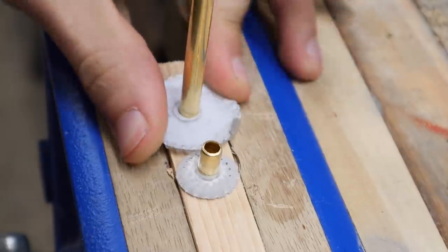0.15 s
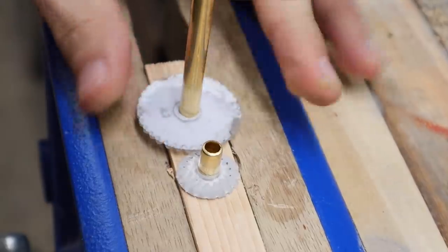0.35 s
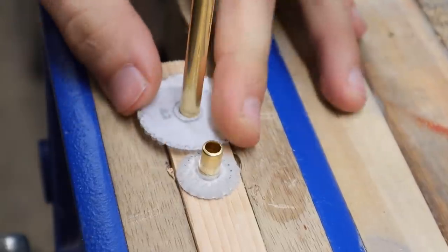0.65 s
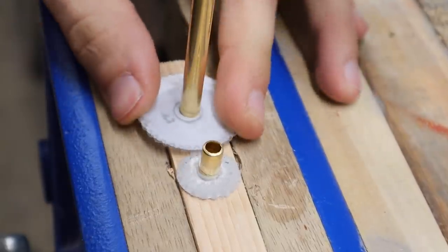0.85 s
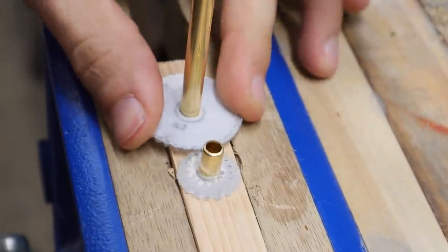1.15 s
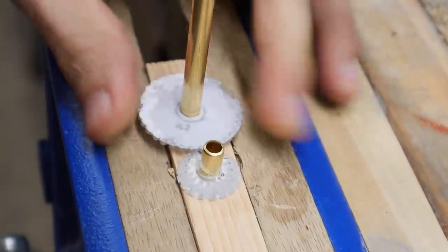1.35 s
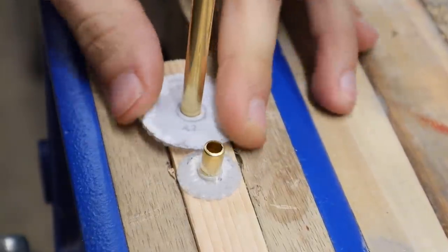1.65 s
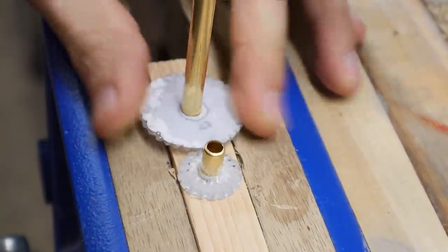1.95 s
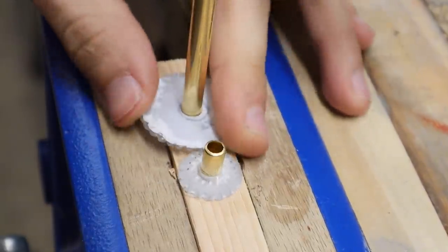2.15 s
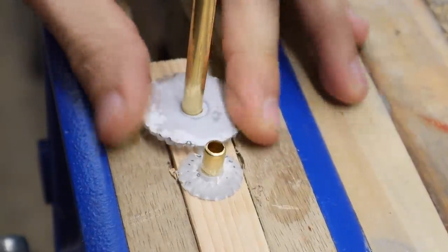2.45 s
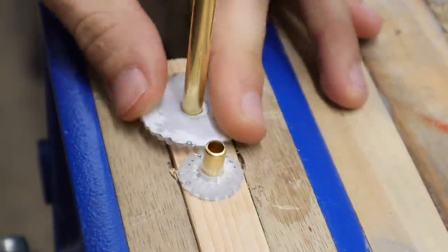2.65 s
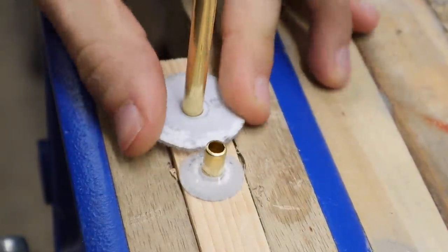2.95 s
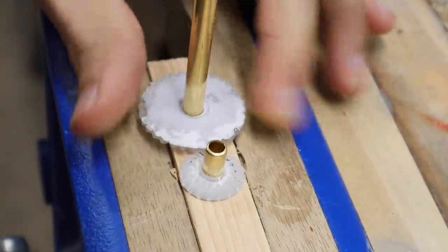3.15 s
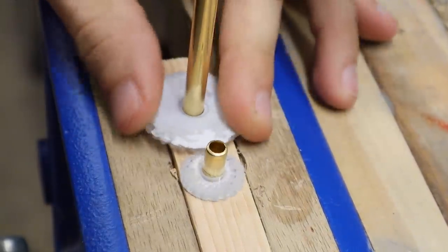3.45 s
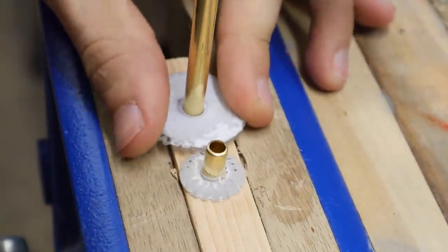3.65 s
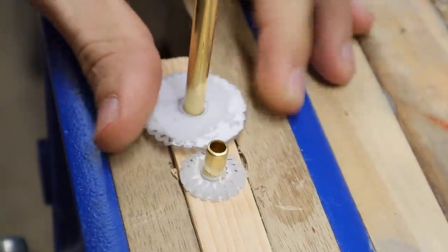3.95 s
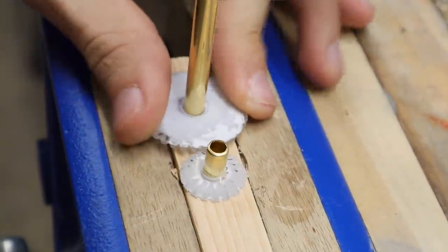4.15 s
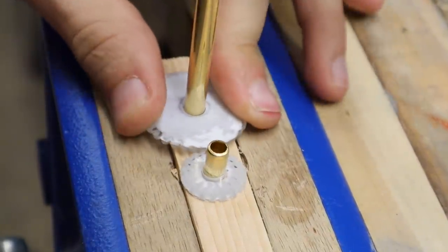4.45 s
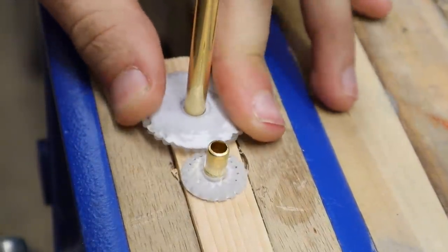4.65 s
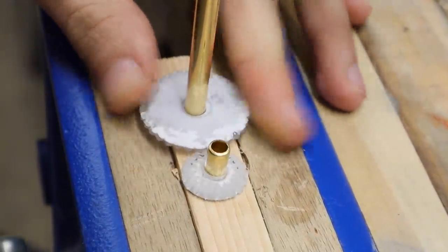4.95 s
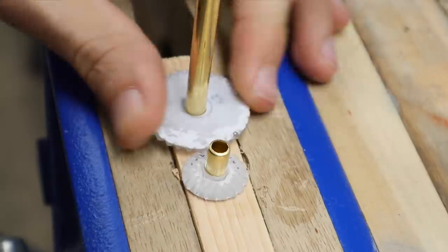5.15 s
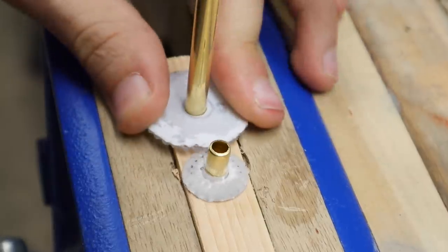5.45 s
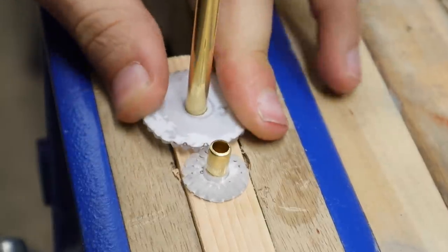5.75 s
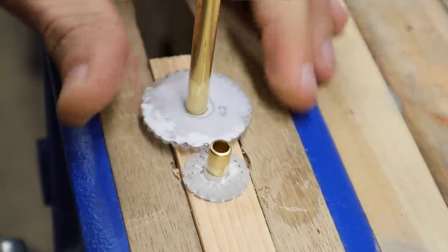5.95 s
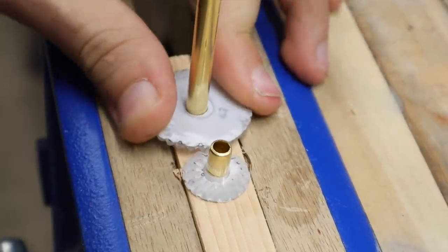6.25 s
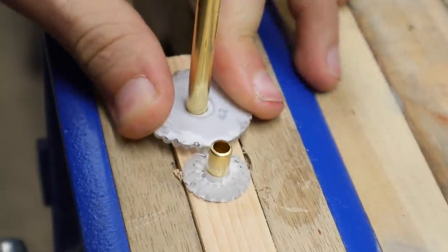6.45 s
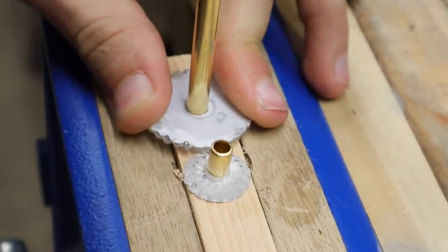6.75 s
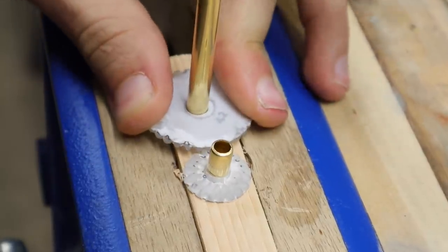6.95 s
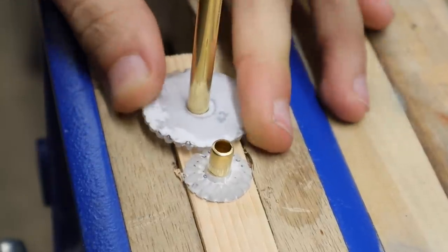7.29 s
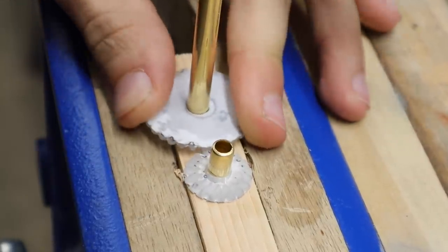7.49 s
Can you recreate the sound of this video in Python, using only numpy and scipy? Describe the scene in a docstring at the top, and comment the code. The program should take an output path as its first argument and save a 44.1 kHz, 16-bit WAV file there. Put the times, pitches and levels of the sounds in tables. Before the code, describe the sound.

Metal gear teeth catch and slip with irregular sharp clicks, light ticks and soft bumps, close up in a quietly humming workshop.

```python
"""Hand-turned metal gears

Two hand-cut metal gears on brass tubes are turned by hand on a wooden workbench.
Rough teeth bind, scrape and snap past each other; each snap cracks, rings the tube and thumps the bench.
Light ticks and soft low bumps on the bench fall between the snaps.
Behind them a small workshop hums, with the thin whine of a fan."""
import sys
import numpy as np
from scipy import signal
from scipy.io import wavfile

SR = 44100
rng = np.random.default_rng(int(sys.argv[2]) if len(sys.argv) > 2 else 0)


def store_pcm(level_fs):
    """Save levels as 16-bit WAV."""
    pcm = np.round(np.clip(level_fs, -1, 1) * 32767).astype(np.int16)
    wavfile.write(sys.argv[1], SR, np.atleast_2d(pcm).T)


N = 336042
RING_TIME = np.arange(SR // 3) / SR   # seconds since a hit began
BAND_EDGES_HZ = np.geomspace(22, 17000, 30)
BAND_HZ = np.sqrt(BAND_EDGES_HZ[1:] * BAND_EDGES_HZ[:-1])

# Sharp snaps, light ticks and soft low bumps on the bench. Each row: start in seconds, level in dB,
# contact time in seconds, boosts in dB for bench thud, board knock, tube ring and sharp edge,
# then the gear's note in Hz.
HITS = [ (0.2042, 12, 0.0018, -5.5, 8.5, -9, 0.5, 5030), (0.465, -13, .02, -1, 1, -20, 2, 3330),
        (0.477, -21.5, 0.0025, -4, -4, -12, 20, 3500), (0.945, -16, 0.0093, 10, 13, -16, 10, 4900),
        (1.520, -15.5, 0.0087, 8, 1.5, -17, 13, 3840), (2.147, -13, 0.0088, 4.5, -16, 3.5, 7, 2090),
        (2.4401, -9, 0.003, 9.5, -2, 6.5, 12, 5200), (2.659, -16.5, 0.0068, -10, -12, -16, 6, 5380),
        (2.9227, 5, 0.002, 2.5, 3, -11, 2, 3110), (2.930, -2, 0.0024, -12, 5, -4, 0, 2000),
        (3.327, -20, 0.0045, -4, -10, -10, 11, 3660), (3.572, -13.5, 0.0074, -14, 2, -23, 2, 3850),
        (3.8159, 2, 0.00092, -0.5, 3.5, -1.5, 1, 3560), (4.118, -22, 0.0027, -14, 4, -8, 20, 5240),
        (4.463, -19, .025, 15.5, 19, 10.5, 3, 5300), (4.7723, -12, 0.0088, 14.5, 0, -17, 14, 5130),
        (4.9505, -6.5, 0.00093, 0, -10, -16, 8, 3720), (4.955, -3.5, .0015, 2, 5, -4, 2, 3730),
        (5.150, -14, 0.014, 0, -3, 1, 4, 2020), (5.4722, -7, 0.0014, 5.5, 9, 1.5, -13, 3830),
        (6.075, -18, 0.0011, -6, -12, -16, 12, 3800), (6.701, 15, 0.0012, 6, 4, -3.5, 6.5, 2020),
        (7.289, -8, 0.0036, 8.5, -10, 7, 7.5, 5330), (7.296, -10, 0.024, -14, 9.5, 5, 8, 2140)]
# Where a hit's tone is shaped, in Hz: thud, knock, dip, bottom and top of the metal's ring, edge.
COLOUR_HZ = (260, 480, 750, 1200, 4300, 10000)


def snaps_ticks_and_bumps(dip_db=-4.5, plate_db=-2.5):
    """Each hit, from a tooth slipping free to a soft bump, sets the gears, tube and bench ringing."""
    out = np.zeros(N)
    noise = noise_bands(N)
    for start, db, contact, thud_db, knock_db, tube_db, edge_db, gear_hz in HITS:
        # the bench carries the lows, a sharp edge the highs
        colour = list(zip(COLOUR_HZ, (thud_db, knock_db, dip_db, 0, 0, edge_db)))
        ring_scale = 0.97 * from_db(0.03 * db)   # harder hits ring a little longer
        sound = contact_noise(noise, db, contact, gear_hz, colour, ring_scale)
        sound += gears_and_bench_ring(colour, ring_scale)
        # each hit favours one note of the gear, quickly damped by the fingers
        sound += ringing_note(gear_hz, db=9.5, fade_s=125 / gear_hz, build_cycles=0.73)
        sound += tube_ring(start, tube_db, ring_scale)
        add(out, start, from_db(db) * sound)
    # the gear plate sounds loudest near its own high note
    return out + from_db(plate_db) * resonate(out, hz=5450, width_hz=550)


# The tone of a hit's first burst. Each row: pitch in Hz, level in dB.
CONTACT_TONE = [(60, -10), (250, 1.5), (700, -4), (1100, -8), (1600, -11.5), (2200, 6.5), (2900, -9),
                (3800, -1.5), (5500, -8), (7200, -14.5), (10000, -19), (16000, -30)]
# The tone of the dense ring after it, its tail. Each row: pitch in Hz, level in dB.
TAIL_TONE = [(60, 0), (200, -9), (500, -14), (750, -2), (1100, 5.5), (1600, -6.5), (2200, -18),
             (3500, -16.5), (5500, -23), (7500, -32), (16000, -48)]
# How long the tail lasts. Each row: pitch in Hz, fade time in seconds before ring_scale stretches it.
TAIL_FADE = [(100, 0.5), (400, 0.15), (1200, 0.096), (2500, 0.38), (6000, 0.15), (14000, 0.076)]


def contact_noise(noise, db, contact, gear_hz, colour, ring_scale):
    """The contact makes a burst of noise, and the bench and room give it a dense tail."""
    hz = BAND_HZ[:, None]
    # low notes of the burst build more slowly and last longer than high ones
    rise_s = 0.014 * contact + 0.61 / hz
    fade_s = 18 * contact / (1 + hz / 5000) + 20 / hz
    onset = from_db(at_hz(CONTACT_TONE, hz)) * burst(rise_s, fade_s)
    tail = from_db(at_hz(TAIL_TONE, hz)) * burst(0.0024, ring_scale * at_hz(TAIL_FADE, hz))
    # the harder the hit, the stronger the noise around the gear's note
    note_db = (3.5 + 0.29 * db) * bell_curve(np.log2(hz / gear_hz), width=0.2)
    envelope = np.hypot(onset, tail) * from_db(at_hz(colour, hz) + note_db)
    offset = rng.integers(N - len(RING_TIME))
    grain = noise[:, offset:offset + len(RING_TIME)] * envelope
    # the blow sets the energy of each band, only the grain is chance
    wanted_power = noise.var(axis=1) * envelope.var(axis=1)
    return np.sqrt(wanted_power / grain.var(axis=1)) @ grain


# The notes that gears, tubes and bench share. Each row: pitch in Hz, level in dB,
# fade time in seconds before ring_scale stretches it.
SHARED_NOTES = [(96.5, 5.5, 0.24), (190, -21, 0.22), (242.1, 8, 0.21), (267.5, 8, 0.079), (360, 5, 0.22),
                (403.5, 17.5, 0.25), (445, 1, 0.22), (595, 6.5, 0.069), (684, -16, 0.41),
                (987, 11.5, 0.072), (980, 3, 0.34), (1132, 5, 0.14), (1189, 13, 0.11), (1530, -24, 0.38),
                (2090, -8, 0.34), (2114, 6, 0.071), (2660, 2, 0.12), (2930, 0, 0.42), (3110, 0, 0.042),
                (3580, 1, 0.059), (5440, -8, 0.016), (5500, -6, 0.13)]


def gears_and_bench_ring(colour, ring_scale, vary_db=2.0):
    """The joined parts shake at their natural notes, in a slightly different mix on each hit."""
    sound = np.zeros(len(RING_TIME))
    for hz, db, fade_s in SHARED_NOTES:
        level_db = db + at_hz(colour, hz) - vary_db * rng.standard_normal()
        sound += ringing_note(hz, level_db, ring_scale * fade_s, build_cycles=9.3)
    return sound


# The tube's note as its lean changes. Each row: time in seconds, pitch in Hz.
TUBE_PITCH = [(0.2, 1070), (2.4, 1048), (4.5, 1115), (5.0, 1035), (6.7, 1090), (7.29, 960)]


def tube_ring(start, boost_db, ring_scale):
    """The brass tube rings at a pitch that depends on how it leans in its hole."""
    hz = np.interp(start, *np.transpose(TUBE_PITCH))
    return ringing_note(hz, db=19 + boost_db, fade_s=0.14 * ring_scale, build_cycles=9.6)


# Teeth dragging over each other. Each row: middle in seconds, about half the length in seconds,
# level in dB, squeak pitch in Hz.
SCRAPES = [(0.267, .008, -51, 5200), (0.293, .02, -64, 5400), (0.624, 0.0086, -58, 5040),
           (.843, 0.0057, -55.5, 5430), (1.052, 0.018, -59, 5230), (1.17, 0.028, -63, 5230),
           (1.605, .007, -62, 4040), (1.625, 0.014, -51, 6440), (1.676, 0.013, -61, 4200),
           (1.864, 0.013, -51.5, 5000), (1.918, .022, -56.5, 5400), (2.457, 0.041, -58.5, 5300),
           (2.755, 0.011, -62.5, 4280), (3.126, 0.088, -67.5, 5450), (3.68, 0.16, -67, 5570),
           (4.783, 0.0022, -45, 5000), (5.139, 0.0063, -52.5, 5150), (5.201, 0.027, -59, 2920),
           (7.31, 0.025, -63, 5160)]
# The notes of the gear plate. Each row: pitch in Hz, width in Hz, level in dB.
PLATE_NOTES = [(2030, 310, -2.5), (3520, 510, 3), (4370, 1500, -2), (5320, 700, 0.5), (8040, 400, -11),
               (11200, 3500, -15.5)]


def tooth_scrapes(slips_per_s=1500, uneven_db=3.5, rub_db=-71.5, rub_swing_db=10,
                  treble_hz=6500, treble_db=3, squeak_db=-2):
    """Burrs catch and slip in quick, uneven ticks that ring the gear plate; a faint rub never stops."""
    t = np.arange(N) / SR
    slips = (rng.random(N) < slips_per_s / SR) * rng.choice([-1, 1], N)
    slips = slips * from_db(uneven_db * np.minimum(rng.exponential(1, N), 4))
    plate = unit_level(sum(from_db(db) * resonate(slips, hz, width) * (-1) ** k
                           for k, (hz, width, db) in enumerate(PLATE_NOTES)))
    low = signal.sosfilt(signal.butter(3, treble_hz, "low", fs=SR, output="sos"), plate)
    high = signal.sosfilt(signal.butter(3, treble_hz, "high", fs=SR, output="sos"), plate)
    bright_plate = low + from_db(treble_db) * high
    out = from_db(rub_db + rub_swing_db * np.tanh(drift(per_s=14))) * plate
    chatter_db = 2.5 * drift(per_s=150)   # rough tooth sides make the pressure uneven
    for middle, half, db, squeak_hz in SCRAPES:
        near = np.abs(t - middle) < 4 * half
        squeak = from_db(squeak_db) * unit_level(resonate(slips[near], squeak_hz, width_hz=300))
        pressure = from_db(db + chatter_db[near]) * bell_curve(t[near] - middle, half)
        out[near] += pressure * (unit_level(bright_plate[near]) + squeak)
    return out


# The rush of the workshop's air. Each row: pitch in Hz, level in dB.
AIR_TONE = [(25, -43), (45, -41.5), (95, -40), (130, -40.5), (270, -42.5), (600, -47), (780, -44),
            (980, -42), (1500, -48.5), (2300, -51.5), (4500, -58), (8000, -58.5), (12000, -60),
            (16000, -62)]
# Mains hum and fan whine. Each row: pitch in Hz, level in dB, pitch wander in Hz, level flutter in dB.
HUM_AND_FAN = [(59.9, -53, 0.37, 1.5), (90.5, -69, 2.82, 4.5), (853.5, -60.5, 1.245, 0.75),
               (1071, -69, 3.98, 1), (2535, -76, 4.44, 2), (4210, -78, 4.97, -0.2), (4480, -77.5, 5.3, 1.5),
               (9140, -81.5, 17, .5)]


def workshop():
    """Steady air noise lies under the mains hum and the slightly wavering tones of a fan."""
    out = from_db(at_hz(AIR_TONE, BAND_HZ)) @ noise_bands(N)
    for hz, db, wander_hz, flutter_db in HUM_AND_FAN:
        phase = 2 * np.pi * np.cumsum(hz + wander_hz * drift(per_s=12)) / SR
        out += np.sqrt(2) * from_db(db + flutter_db * drift(per_s=7.3)) * np.sin(phase)
    return out


def ringing_note(hz, db, fade_s, build_cycles):
    """A struck note builds over about build_cycles, then fades; db is its peak in the spectrum."""
    shape = swell(build_cycles / hz, fade_s)
    return from_db(db) * 2 * shape / shape.sum() * np.sin(2 * np.pi * (hz * RING_TIME + rng.random()))


def swell(rise_s, fade_s):
    """A loudness curve that builds up and dies away, losing 60 dB every fade_s seconds."""
    return (1 - np.exp(-RING_TIME / rise_s)) * np.exp(-np.log(1000) * RING_TIME / fade_s)


def burst(rise_s, fade_s):
    """A swell with a total energy of 1."""
    shape = swell(rise_s, fade_s)
    return shape / np.sqrt(np.sum(shape ** 2, axis=-1, keepdims=True))


def resonate(x, hz, width_hz):
    """Let through the part of a sound near one pitch."""
    return signal.lfilter(*signal.iirpeak(hz, hz / width_hz, fs=SR), x)


def noise_bands(size):
    """White noise in bands a third of an octave wide; neighbours are unrelated."""
    white = rng.standard_normal((2, size + SR // 4))
    filters = [signal.butter(2, edges, "band", fs=SR, output="sos")
               for edges in zip(BAND_EDGES_HZ, BAND_EDGES_HZ[1:])]
    return np.array([signal.sosfilt(band, white[k % 2])[-size:] for k, band in enumerate(filters)])


def drift(per_s):
    """A random wander, about 1 in size, that heads for a new value per_s times a second."""
    points = rng.standard_normal(2000)
    return unit_level(np.interp(np.arange(N) / SR * per_s, np.arange(len(points)), points))


def at_hz(table, hz):
    """Read a table at any pitch, sliding smoothly between its rows."""
    pitches, values = np.transpose(table)
    return np.interp(np.log(hz), np.log(pitches), values)


def add(out, start, sound):
    """Mix a sound in at a start time in seconds."""
    first = round(start * SR)
    out[first:first + len(sound)] += sound[:N - first]


def bell_curve(x, width):
    return np.exp(-0.5 * (x / width) ** 2)


def from_db(db):
    return 10 ** (np.asarray(db) / 20)


def unit_level(x):
    return x / np.sqrt(np.mean(x ** 2) + 1e-20)


def scene():
    """One close microphone hears everything, the same in both channels."""
    return np.tile(snaps_ticks_and_bumps() + tooth_scrapes() + workshop(), (2, 1))


# A faint hiss. Each row: pitch in Hz, level in dB.
HISS_TONE = [(30, -104), (70, -88), (150, -79), (500, -63), (1100, -90), (2200, -83), (4500, -71),
             (9000, -69), (15000, -69.5)]


def record(dry, cutoff_hz=15950):
    """Hiss is added on the left and subtracted on the right; the highest treble is cut."""
    hiss = from_db(at_hz(HISS_TONE, BAND_HZ)) @ noise_bands(N)
    treble_cut = signal.ellip(12, 0.1, 80, cutoff_hz, fs=SR, output="sos")
    return signal.sosfilt(treble_cut, dry + hiss * [[1], [-1]])


dry = scene()
out = record(dry)
store_pcm(out)
```